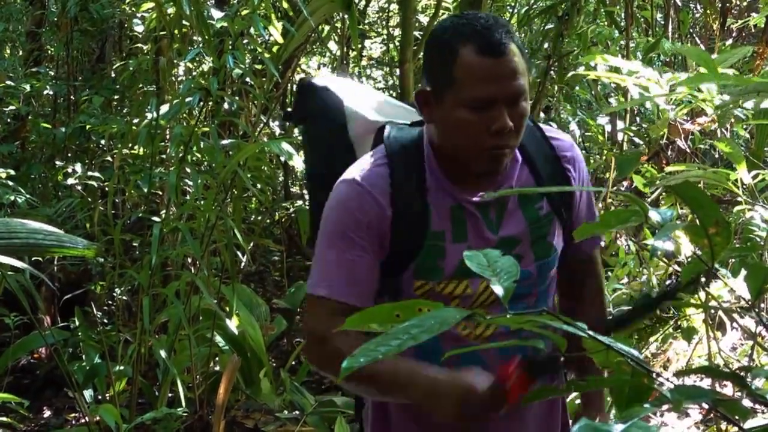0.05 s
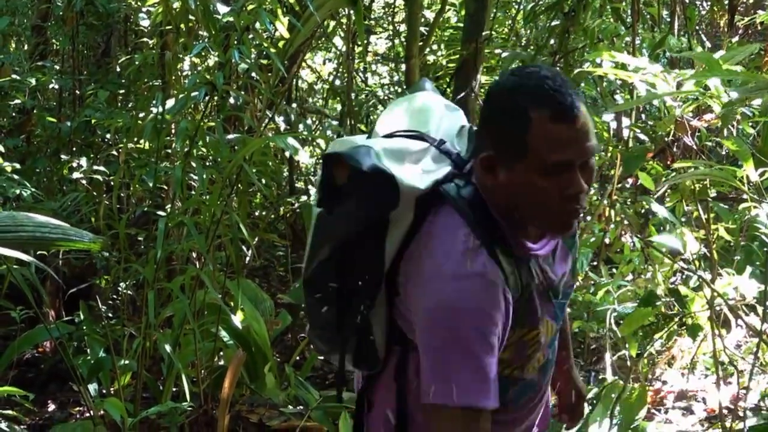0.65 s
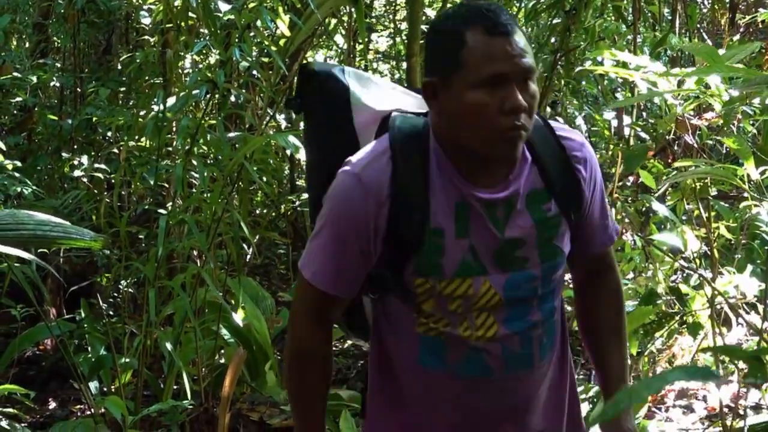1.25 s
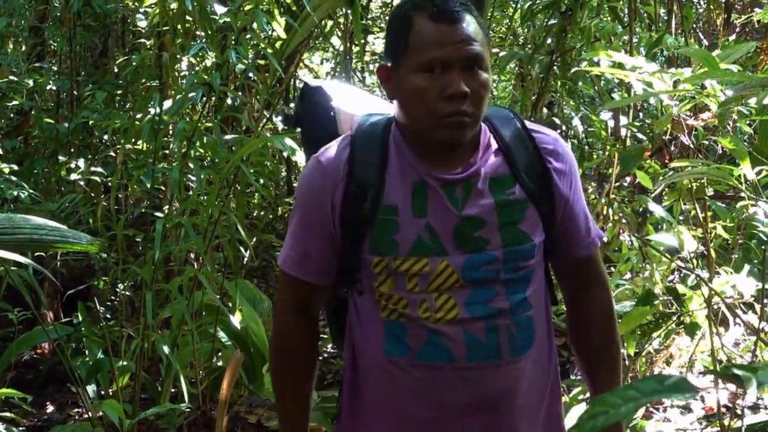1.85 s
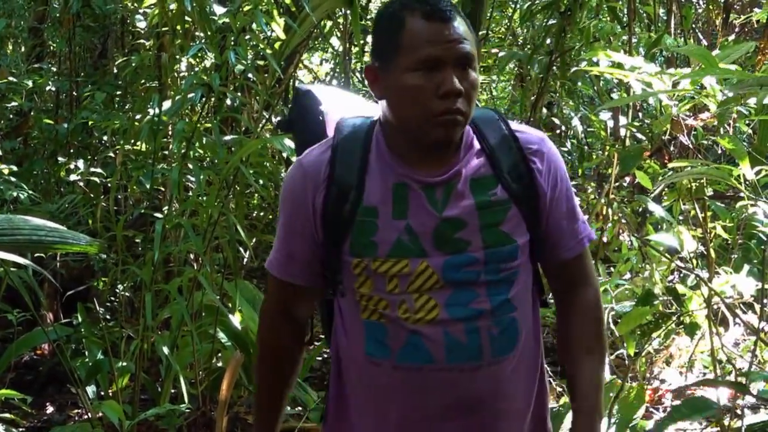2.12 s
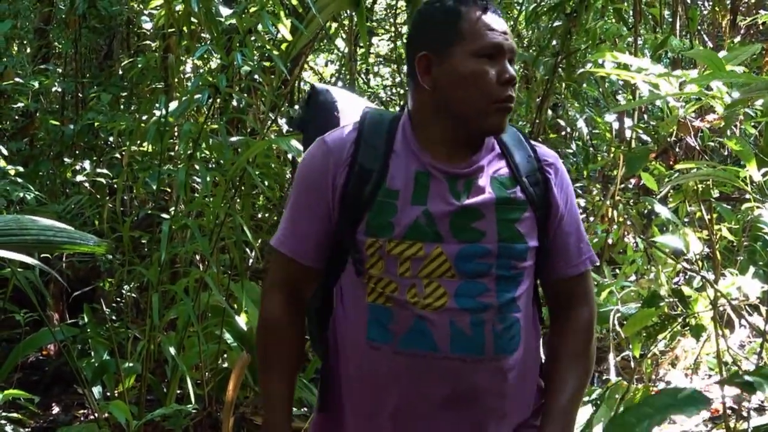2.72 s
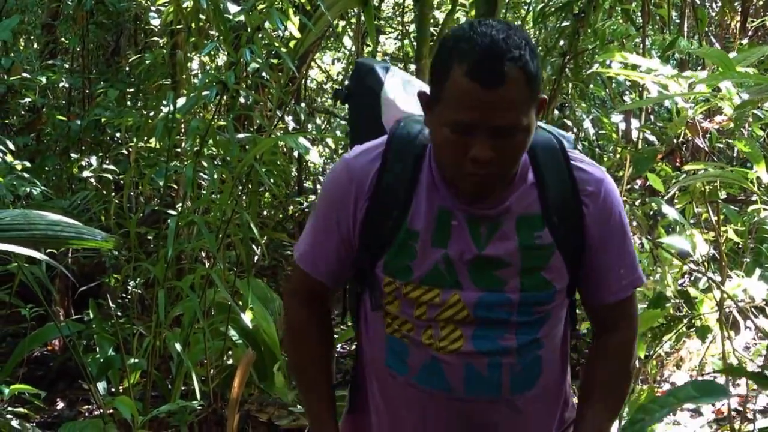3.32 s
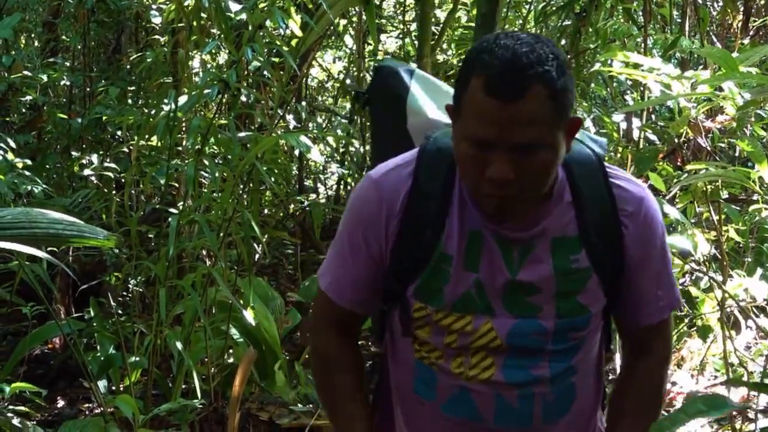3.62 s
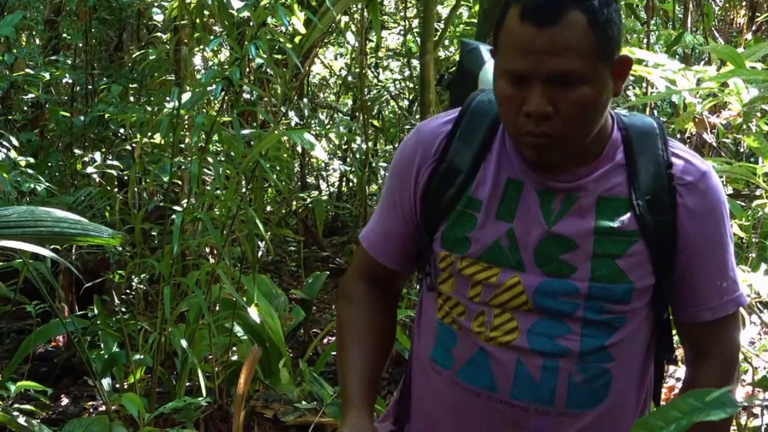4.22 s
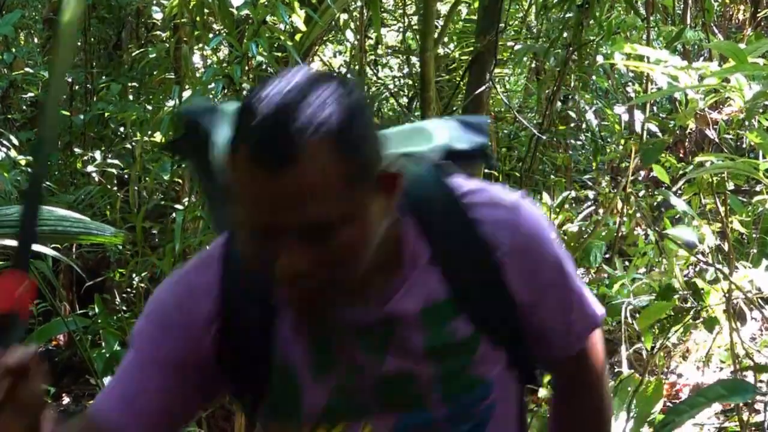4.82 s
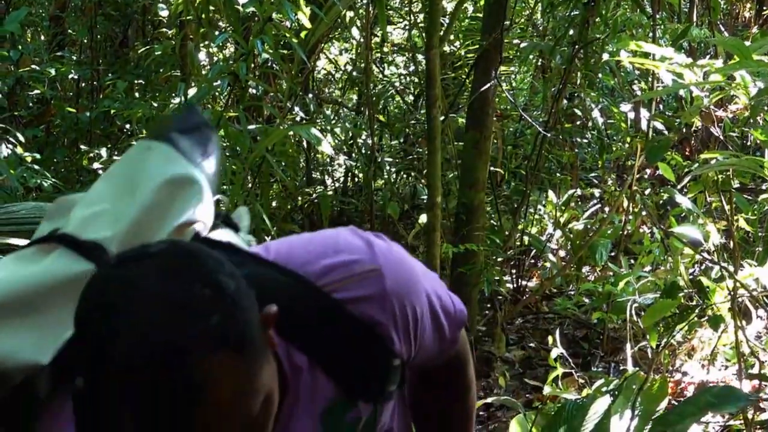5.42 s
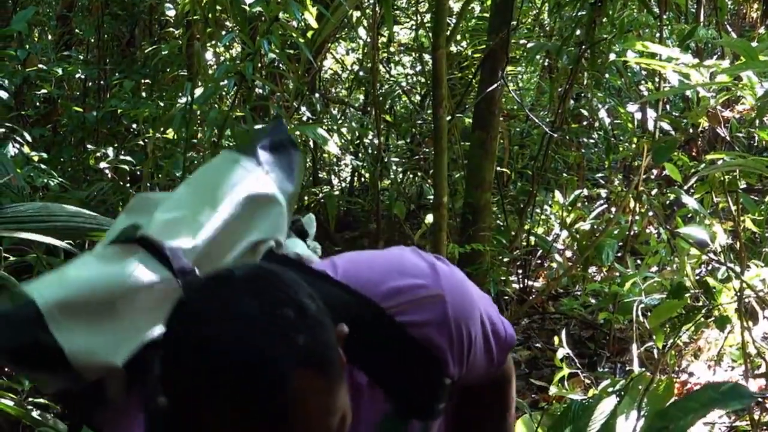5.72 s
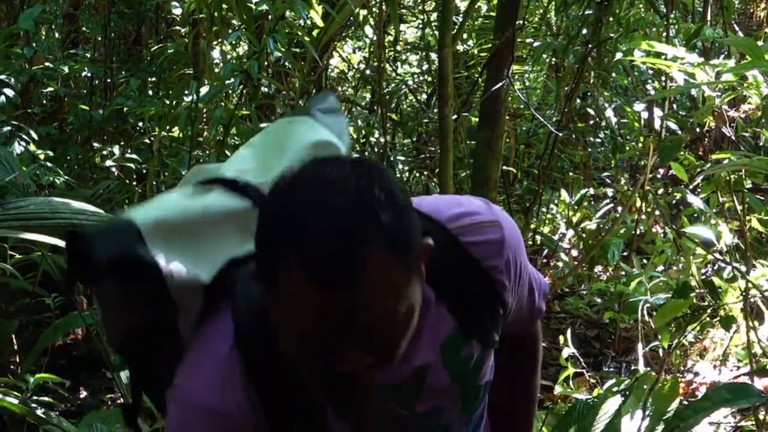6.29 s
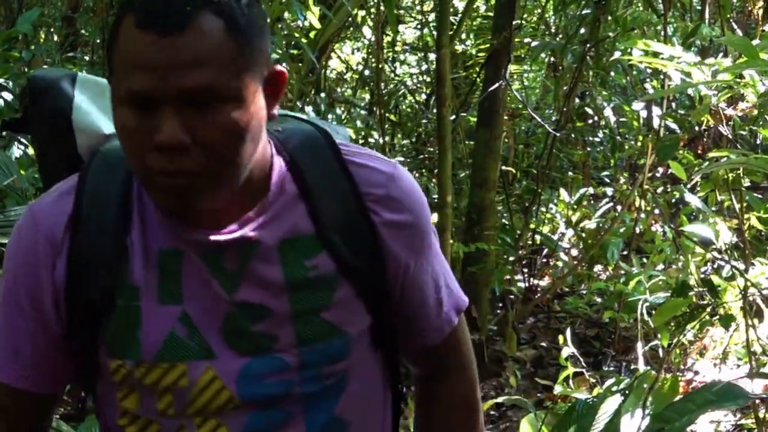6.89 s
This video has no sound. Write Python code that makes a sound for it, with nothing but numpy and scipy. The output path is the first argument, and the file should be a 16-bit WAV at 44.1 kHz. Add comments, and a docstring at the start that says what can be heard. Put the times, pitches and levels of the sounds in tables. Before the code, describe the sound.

Sharp blade chops tear through jungle plants in two bursts, with quieter leaf rustling between them and high insects buzzing throughout.

```python
"""A machete slashes through stems and leaves in a rain forest, a few steps away.
Each cut tears fibres, rings a stalk and thumps the ground; the steel sings where it glances off.
Twigs snap, stalks knock, a foot falls, leaves scrape over cloth, a bat or insect ticks; trunks echo it.
Foliage rustles and settles, feet stir the litter, insects shrill, a small caller peeps, far leaves hiss.
The camera's gain drops at each loud chop and creeps back up."""
import sys
import numpy as np
from scipy import signal
from scipy.fft import rfft, irfft, next_fast_len
from scipy.io import wavfile
from scipy.ndimage import uniform_filter1d

SR = 44100
rng = np.random.default_rng(int(sys.argv[2]) if len(sys.argv) > 2 else 0)


def digitize_waveform(pressure):
    """Quantize a signal to 16-bit integers and store it at the path in sys.argv[1].

    Rows of a 2-D input are taken as channels; values are limited to [-1, 1].
    """
    field = np.atleast_2d(pressure).T
    bounded = np.clip(field, -1, 1)
    quanta = np.round(bounded * 32767).astype(np.int16)
    wavfile.write(sys.argv[1], SR, quanta)


N = 306495
TIME = np.arange(N) / SR


def undb(db):
    """Decibels to gain."""
    return 10 ** (np.asarray(db) / 20)


def unit(x):
    """Scale to rms 1."""
    return x / np.sqrt(np.mean(x ** 2))


def decay(t, t60):
    """Exponential fall, 60 dB in t60 seconds."""
    return np.exp(-np.log(1000) * t / t60)


def wander(rate_hz):
    """Smooth random drift, spread near 1."""
    step = int(SR / rate_hz)
    return 1.3 * uniform_filter1d(np.repeat(rng.standard_normal(N // step + 1), step), step)[:N]


def colour(x, spectrum, tilt_db=0):
    """Minimum-phase filter through (Hz, dB) rows, tilted per octave about 3 kHz; output rms 1."""
    size = 2 * next_fast_len(x.shape[-1] // 2 + 1)
    octave = np.log2(np.maximum(np.arange(size // 2 + 1) * SR / size, 1))
    hz, db = np.transpose(spectrum)
    gain = undb(np.interp(octave, np.log2(hz), db) + tilt_db * np.maximum(octave - np.log2(3000), -3))
    cepstrum = irfft(np.log(gain))[:size // 2]
    response = np.exp(rfft(np.r_[cepstrum[0], 2 * cepstrum[1:]], size))
    return unit(irfft(rfft(x, size) * response)[..., :x.shape[-1]])


def resonate(x, hz, q):
    """One two-pole resonance."""
    return signal.lfilter(*signal.iirpeak(min(hz, .4 * SR), max(q, 3 * hz / SR), fs=SR), x)


def crackle(count, per_s, spread_db):
    """Tiny fractures: clicks of random time, sign and size; rms 1."""
    size = undb(spread_db * np.minimum(rng.exponential(size=count), 4))
    return unit((rng.random(count) < per_s / SR) * size * rng.choice([-1, 1], count))


def stereo(mid, side, side_db):
    """Mid and side to left and right, widest in the treble."""
    side = signal.sosfilt(signal.butter(1, 300, "high", fs=SR, output="sos"), side)
    treble = signal.sosfilt(signal.butter(2, 6000, "high", fs=SR, output="sos"), side)
    return mid + undb(side_db) * (side + 0.8 * treble) * np.array([[1], [-1]])


def noise(count, spectrum, side_db):
    """Coloured stereo noise, rms 1."""
    return colour(stereo(*rng.standard_normal((2, count)), side_db), spectrum)


def add(out, start_s, x, pan_db=0):
    """Mix x in at start_s; pan is left minus right."""
    i = int(start_s * SR)
    x = x[..., :N - i]
    out[:, i:i + x.shape[-1]] += x * undb(np.array([[pan_db], [-pan_db]]) / 2)


# Far leaves and air. Each row: frequency in Hz, relative level in dB.
HUSH_SPECTRUM = [(25, -67), (60, -25), (150, -16.5), (300, -5), (700, 2), (1400, -2.5), (2800, -11.5),
                 (5500, -16), (9500, -28.5), (11500, -25.5), (16000, -29)]

def hush():
    """Distant leaves and air: soft, nearly steady noise."""
    return noise(N, HUSH_SPECTRUM, side_db=-8.5) * undb(-41 + 0.54 * wander(8))


# Far insects. Each row: frequency in Hz, relative level in dB.
DRONE_SPECTRUM = [(5400, -34.5), (6150, -12), (6500, -0.5), (6800, 0.5), (7200, -9), (7600, -3),
                  (7950, 0.5), (8400, -36.5)]

def far_insects():
    """Many distant raspers blur into a shrill, wavering drone."""
    return noise(N, DRONE_SPECTRUM, side_db=-8.5) * undb(-41.5 + 3.1 * wander(6.2) + wander(50))


# Phrases of the highest insect. Each entry: start in seconds.
PHRASE_STARTS_S = [1.4, 2.85, 4.3, 6.2]
# Its two bands. Each entry: base frequency in Hz.
THIN_BANDS_HZ = [12550, 13150]

def thin_insect(phrase_s=0.76, throb_hz=13.3, bend_hz=180):
    """A thin, throbbing call that arches in pitch and level."""
    out, t = np.zeros((2, N)), TIME[:SR]
    arch = np.sin(np.pi * np.minimum(t / phrase_s, 1))
    throb = undb(-57 + 1.6 * np.sin(2 * np.pi * throb_hz * t))
    lowpass = signal.butter(2, 85, fs=SR, output="sos")
    for start_s in PHRASE_STARTS_S:
        for hz in THIN_BANDS_HZ:
            flutter = unit(signal.sosfilt(lowpass, rng.standard_normal((2, SR))))
            tone = np.sin(2 * np.pi * np.cumsum(hz + bend_hz * arch) / SR)
            add(out, start_s, arch * throb * flutter * tone)
    return out


# Calls from the trees. Each row: start in seconds, level in dB, number of notes.
PEEP_CALLS = [(.398, -47, 1), (1.178, -47.5, 2), (2.171, -46, 2), (3.252, -42, 2), (4.484, -42, 1),
              (5.655, -43.5, 1), (6.555, -44, 2)]

def peeps(hz=4704, note_s=0.051, spacing_s=.106):
    """A small caller's pure notes, smeared into a wavering tail by the trees."""
    out, t = np.zeros((2, N)), TIME[:SR // 3]
    note = np.sin(2 * np.pi * hz * t) * np.minimum(t / 0.0065, 1) * np.exp(-(t / note_s) ** 4)
    for start_s, db, notes in PEEP_CALLS:
        for k in range(round(notes)):
            white = rng.standard_normal((2, len(t)))
            smear = unit(resonate(resonate(white, hz, q=41), hz, q=41))
            tail = smear * np.minimum(t / 0.026, 1) * np.exp(-t / 0.064)
            add(out, start_s + k * spacing_s, undb(db) * (1.9 * note + 1.3 * tail))
    return out


# Insect rasp. Each row: frequency in Hz before tuning, relative level in dB.
BUZZ_SPECTRUM = [(6600, -48), (7150, -14.5), (7550, -3.5), (7800, 0), (8020, -0.5), (8280, -44),
                 (8700, -49.5)]

def buzz(count, hz):
    """An insect's narrow, flickering noise band, tuned to peak at hz."""
    band = np.array(BUZZ_SPECTRUM) * [hz / BUZZ_SPECTRUM[3][0], 1]
    return noise(count, band, side_db=-6) * undb(0.83 * wander(90)[:count])


# The nearest insect. Each row: start in seconds, level in dB, delay of the second swell in seconds.
RASP_CALLS = [(.983, -34, 0.32), (2.172, -31.5, 0.24), (3.511, -31.5, 0.23), (4.711, -33, .22),
              (6.08, -34.5, 0.26)]

def near_insects(chorus_hz=7730, caller_hz=7840, swell_s=0.24):
    """One insect rasps in double swells over the unbroken chorus of its neighbours."""
    out = buzz(N, chorus_hz) * undb(-43.5 + 1.5 * wander(6))
    swell = np.sin(np.pi * np.minimum(TIME[:SR] / swell_s, 1)) ** 0.6
    for start_s, db, delay_s in RASP_CALLS:
        add(out, start_s, undb(db) * swell * buzz(SR, caller_hz))
        add(out, start_s + delay_s, undb(db - 2) * swell * buzz(SR, caller_hz))
    return out


def trunk_echo(x):
    """Stems and trunks scatter a thin, fading echo, different at each ear."""
    t = TIME[:SR]
    scatter = np.array([crackle(SR, per_s=2500, spread_db=7.5) for _ in range(2)])
    echo = colour(scatter, [(60, -24), (400, 0.5), (2000, -2), (6000, 2.5), (14000, 2)])
    mid, side = echo * np.minimum(t / 0.0053, 1) * decay(t, t60=0.54)
    response = stereo(mid, side, side_db=-9) / np.sqrt(np.sum(mid ** 2))
    return undb(-9) * signal.fftconvolve(x.mean(axis=0)[None], response, axes=1)[:, :N]


# The body brushes a plant. Each row: start in seconds, rustle and scrape levels in dB,
# scrape rise and t60 in seconds.
PLANT_BRUSHES = [(.25, -38.5, -42, 0.034, 0.45), (2.408, -37, -25, 0.025, 0.2), (2.95, -35, -38, 0.026, .3),
                 (3.08, -45.5, -48, .02, .2), (3.6, -47, -41, .02, 0.23), (3.77, -41, -36, .0065, 0.37),
                 (4.605, -36, -30.5, .025, 0.38), (5.16, -41, -21, 0.016, 0.13)]
# Leaf on cloth. Each row: frequency in Hz, relative level in dB.
SCRAPE_SPECTRUM = [(500, -27), (1500, -0.5), (3200, -16), (4300, 1.5), (6000, 1.5), (8000, -11),
                   (10000, -7.5), (12000, -20), (16000, -15)]

def cloth_scrapes():
    """A leaf drags across fabric: bright grains that swell and die."""
    out, t = np.zeros((2, N)), TIME[:SR // 2]
    for start_s, _, db, rise_s, t60 in PLANT_BRUSHES:
        pressure = np.minimum(t / rise_s, 1) * decay(np.maximum(t - rise_s, 0), t60)
        mid = crackle(len(t), per_s=5600, spread_db=0)
        side = crackle(len(t), per_s=7700, spread_db=5)
        grains = colour(stereo(mid, side, side_db=-14), SCRAPE_SPECTRUM)
        add(out, start_s, undb(db) * pressure * grains)
    return out


def flurry(peak_s, db, swell_s, t60):
    """Gain of a rustle: up 60 dB over swell_s, then dying away."""
    return undb(db - 60 * np.maximum((peak_s - TIME) / swell_s, (TIME - peak_s) / t60))


# Cut foliage settling. Each row: peak time in seconds, level in dB, t60 in seconds.
LEAF_FALLS = [(0.851, -21.5, 1.05), (5.42, -26, 0.89), (6.2, -31, 2.7)]
# Litter stirring underfoot. Each row: time in seconds, level in dB.
LITTER_LEVELS = [(0, -50), (1.4, -44), (1.75, -59), (2.1, -47), (3.4, -47.5), (4.9, -47), (5.8, -40.5),
                 (6.95, -50)]
# Rustling leaves. Each row: frequency in Hz, relative level in dB.
LEAF_SPECTRUM = [(30, -34), (130, -21.5), (280, -1), (600, -0.5), (1300, 4), (2500, 1), (5000, 0),
                 (7000, -5.5), (9500, -10), (12000, -22), (16000, -23)]

def foliage(lag_s=0.023):
    """Falling, brushed and trodden leaves crinkle in uneven flurries, with dry ticks."""
    mid = crackle(N, per_s=5000, spread_db=3)
    side = crackle(N, per_s=5000, spread_db=4.5)
    leaves = colour(stereo(mid, side, side_db=-11.5), LEAF_SPECTRUM)
    clicks = crackle(N, per_s=45, spread_db=2)
    ticks = unit(resonate(resonate(clicks, 2500, q=0.47), 2500, q=0.45))
    falling = sum(flurry(s, db, swell_s=0.74, t60=t60) ** 2 for s, db, t60 in LEAF_FALLS)
    shaken = sum(flurry(s + lag_s, db, swell_s=0.55, t60=0.67) ** 2 for s, db, *_ in PLANT_BRUSHES)
    trodden = undb(np.interp(TIME, *np.transpose(LITTER_LEVELS))) ** 2
    motion = np.sqrt(trodden + falling + shaken)
    return (leaves + undb(-11) * ticks) * motion * undb(1.76 * wander(40))


def knock(db, hz, t60):
    """Damp wood or ground answers a blow with a short, hollow knock."""
    t = TIME[:SR // 4]
    push = rng.standard_normal(len(t)) * decay(t, t60)
    ring = resonate(resonate(push, hz, q=2.95), hz, q=0.85)
    return undb(db) * ring / abs(ring).max()


# Stalk knocks and a footfall. Each row: start in seconds, peak in dB, pitch in Hz, t60 in seconds.
THUD_HITS = [(4.635, -13, 1370, 0.027), (5.154, -5, 428, 0.043), (5.229, -25, 259, 0.037),
             (5.289, -25.5, 236, .034), (5.386, -15, 1260, 0.22), (5.427, -21.5, 1060, .1)]

def thuds():
    """Knocks of loose stalks and a dull footfall."""
    out = np.zeros((2, N))
    for start_s, db, hz, t60 in THUD_HITS:
        add(out, start_s, knock(db, hz, t60))
    return out


# Twig snaps, and one thin, high tick of a bat or insect (9580 Hz).
# Each row: start in seconds, peak in dB, pitch in Hz, t60 in seconds, pan in dB.
SNAPS_AND_TICK = [(.344, -25, 4000, 0.033, 0), (.571, 0, 3000, .0074, -9), (.643, -8, 4500, .015, -1),
                  (.674, 0, 2000, 0.023, -4), (1.009, -16, 2460, 0.023, -2),
                  (1.413, -30.5, 3000, 0.024, -1), (1.612, -24, 9580, 0.012, 2),
                  (1.815, -21, 2080, 0.061, 2), (2.378, -22, 3000, .022, -4), (2.981, -27, 2500, 0.039, -2),
                  (3.279, -25, 4000, .02, 0), (3.591, -21.5, 2430, 0.029, 0), (3.613, -24.5, 2980, .02, -5),
                  (3.772, -19, 3560, 0.019, -3), (5.038, -1, 1800, .03, 2), (5.164, 4, 4500, .03, 0),
                  (5.386, -12.5, 2000, .035, -3), (5.939, 8, 1700, .02, 0), (6.245, -6, 2030, 0.019, 3),
                  (6.41, -19.5, 2070, 0.036, -4), (6.536, -20, 2850, .025, -5)]

def snaps_and_tick():
    """Twigs snap and a bat or insect ticks: a click and brief crackle, Q rising with pitch."""
    out, t = np.zeros((2, N)), TIME[:SR // 4]
    for start_s, db, hz, t60, pan_db in SNAPS_AND_TICK:
        burst = crackle(len(t), per_s=8000, spread_db=0) * decay(t, t60)
        burst[0] += 5  # opening click
        ring = resonate(resonate(burst, hz, q=hz / 2000), hz, q=0.66)
        add(out, start_s, undb(db) * ring / abs(ring).max(), pan_db)
    return out


# Glancing blows. Each row: start in seconds, level in dB.
BLADE_GLANCES = [(5.111, -14), (5.134, -27), (5.93, -31)]
# Modes of the steel. Each row: frequency in Hz, relative level in dB, t60 in seconds.
BLADE_MODES = [(4120, 16.5, 0.062), (4190, -3, 0.093), (4670, -10, 0.17), (2360, -8, 0.12)]

def blade_rings():
    """The edge glances off a stem and the steel rings briefly, damped by the hand."""
    out, t = np.zeros((2, N)), TIME[:SR // 3]
    for start_s, db in BLADE_GLANCES:
        ring = sum(undb(mode_db) * np.sin(2 * np.pi * (hz * t + rng.random())) * decay(t, t60)
                   for hz, mode_db, t60 in BLADE_MODES)
        add(out, start_s, undb(db) * ring * np.minimum(t / 0.0059, 1))
    return out


# Tearing fibres. Each row: frequency in Hz, relative level in dB.
FIBRE_SPECTRUM = [(30, -37), (90, -26.5), (170, -16), (300, -3.5), (600, -6), (1000, 0), (2000, 1),
                  (3000, -1.5), (4500, 0.5), (6200, -4), (7500, -11), (10000, -12), (12000, -21),
                  (16000, -21.5)]

def fracture(db, hold_s, t60, tilt_db, rise_s=.001, ring_range_hz=(402, 5030)):
    """Fibres give way in bundles as the edge passes, ringing six random stem resonances."""
    t = TIME[:SR // 2]
    force = np.minimum(t / rise_s, 1) * decay(np.maximum(t - rise_s - hold_s, 0), t60)
    bundles = unit(undb(1.3 * wander(450)[:len(t)]))
    mid = crackle(len(t), per_s=9000, spread_db=0.5)
    side = crackle(len(t), per_s=9000, spread_db=1.5)
    fibres = bundles * stereo(mid, side, side_db=-13.5)
    modes_hz = np.exp(rng.uniform(*np.log(ring_range_hz), size=6))
    ring = sum(resonate(fibres, hz, q=55) for hz in modes_hz)
    return undb(db) * force * colour(fibres + 0.71 * ring, FIBRE_SPECTRUM, tilt_db)


# Modes of a struck stalk, and a low thump of the ground (90 Hz).
# Each row: frequency in Hz, relative level in dB, t60 and delay in seconds.
IMPACT_MODES = [(933, 0.5, 0.081, .002), (1440, -5.5, 0.1, 0.00198), (2270, -2, 0.15, .006),
                (636, -11, .07, 0.0036), (358, -9, .055, 0.01105), (225, -19, 0.077, .008),
                (90, -33.5, .08, .006)]
# Machete strokes. Each row: bite time in seconds, graze and bite levels in dB, bite hold in seconds,
# knock level in dB, tear delay in seconds, tear level in dB, tear t60 in seconds,
# tear tilt in dB per octave, pan in dB.
MACHETE_STROKES = [(0.529, -52, -13, 0.0011, -35, .0055, -8.5, 0.054, 1, -1.5),
                   (0.5693, -9.5, -7.5, 0.02, -3, 0.025, -8.5, 0.39, 1, -1.7),
                   (0.767, -46, -13.5, .001, -32, 0.0058, -26, 0.12, 0, -1.5),
                   (4.595, -50, -30, .004, -25, 0.011, -38, 0.27, 1.5, -2),
                   (5.008, -47, -3.5, 0.0037, -6, .011, -8.5, 0.13, 2, 2.5),
                   (5.117, -14, -3, 0.007, -12, .031, -3, .17, 3.5, 0),
                   (5.927, -22, -3, 0.0059, -1.5, 0.019, -6, 0.47, .5, -1.1)]

def machete_cuts(graze_lead_s=.01):
    """Each stroke grazes leaves, bites and tears on; the stalk rings and the ground thumps."""
    out = np.zeros((2, N))
    for stroke in MACHETE_STROKES:
        bite_s, graze_db, bite_db, hold_s, knock_db, tear_delay_s, tear_db, t60, tilt_db, pan_db = stroke
        graze = fracture(graze_db, hold_s=0.0049, t60=0.085, tilt_db=1.5)
        bite = fracture(bite_db, hold_s, t60=0.12, tilt_db=1)
        tear = fracture(tear_db, hold_s=0.07 * t60, t60=t60, tilt_db=tilt_db)
        add(out, bite_s - graze_lead_s, graze, pan_db)
        add(out, bite_s, bite, pan_db)
        add(out, bite_s + tear_delay_s, tear, pan_db)
        for hz, mode_db, mode_t60, delay_s in IMPACT_MODES:
            add(out, bite_s + delay_s, knock(knock_db + mode_db, hz, mode_t60))
    return out


def scene():
    """The work close by, its echo, and the forest around it."""
    direct = machete_cuts() + snaps_and_tick() + thuds() + blade_rings() + cloth_scrapes()
    nearby = direct + trunk_echo(direct) + foliage()
    return nearby + near_insects() + far_insects() + thin_insect() + peeps() + hush()


def gain_control(x, threshold_db=-23, depth_db=9, recover_db_per_s=2, detect_s=0.0073):
    """Loud sound pulls the gain down at once; it recovers slowly."""
    power = uniform_filter1d(np.mean(x ** 2, axis=0), int(detect_s * SR))
    over_db = np.clip(10 * np.log10(np.maximum(power, 1e-12)) - threshold_db, 0, depth_db)
    recovery_db = recover_db_per_s * TIME
    return x * undb(recovery_db - np.maximum.accumulate(over_db + recovery_db))


def record(dry):
    """Automatic gain, soft clipping and a steep low-pass."""
    ceiling, cutoff_hz = .85, 15900
    ducked = gain_control(dry)
    rounded = ducked / (1 + (ducked / ceiling) ** 6) ** (1 / 6)
    return signal.sosfilt(signal.ellip(10, .2, 70, cutoff_hz, fs=SR, output="sos"), rounded)


dry = scene()
out = record(dry)
digitize_waveform(out)
```